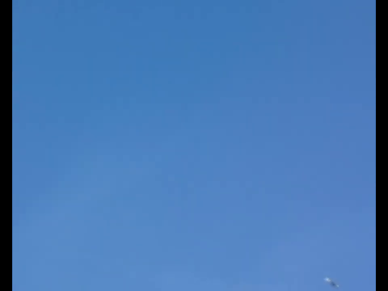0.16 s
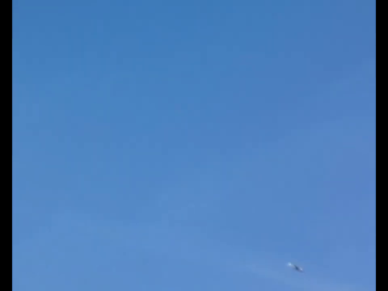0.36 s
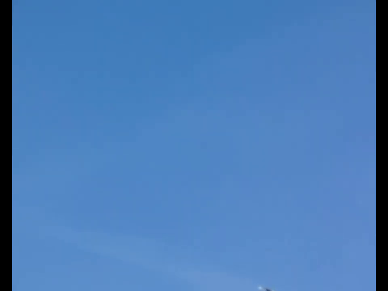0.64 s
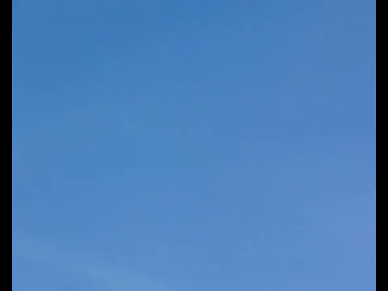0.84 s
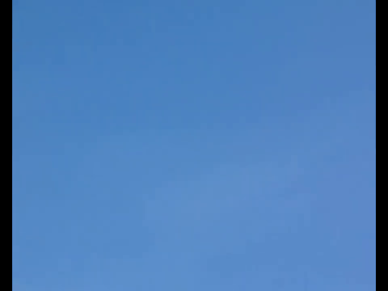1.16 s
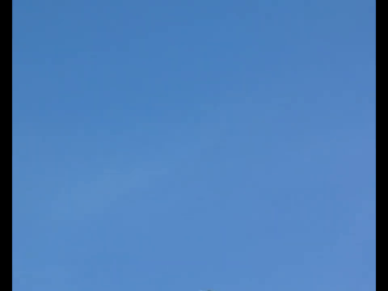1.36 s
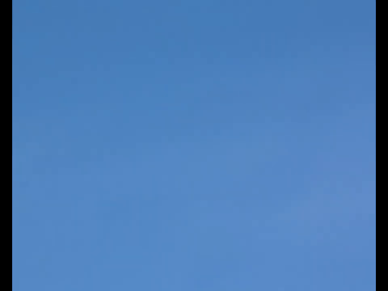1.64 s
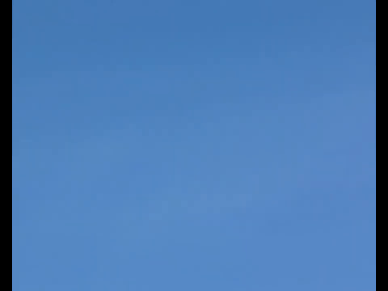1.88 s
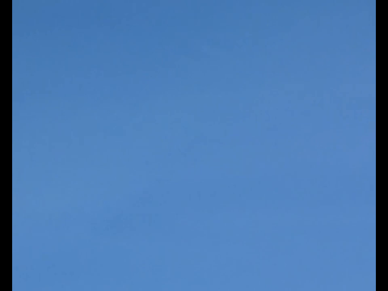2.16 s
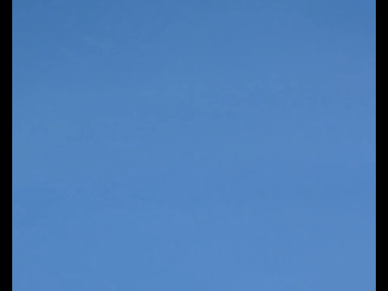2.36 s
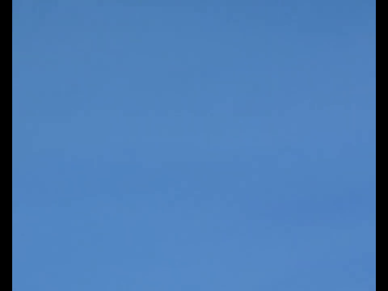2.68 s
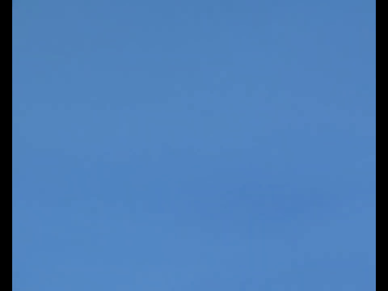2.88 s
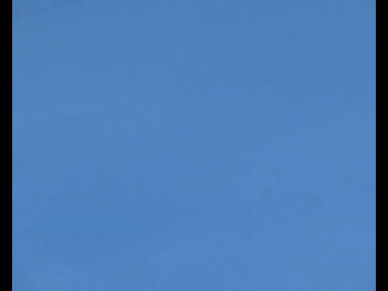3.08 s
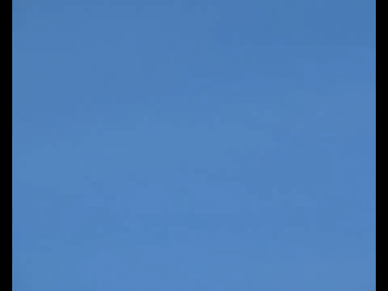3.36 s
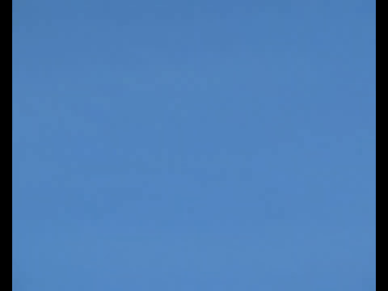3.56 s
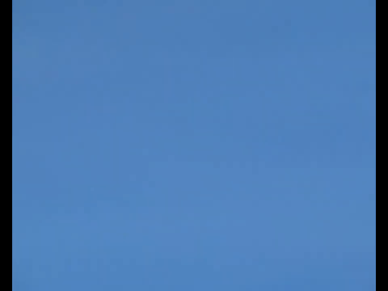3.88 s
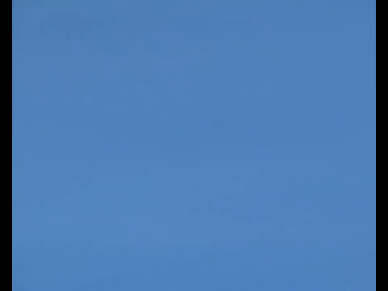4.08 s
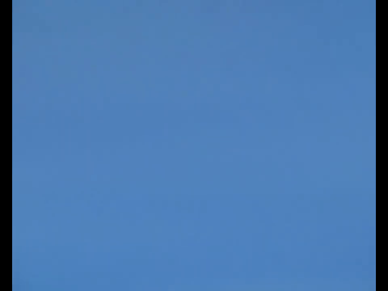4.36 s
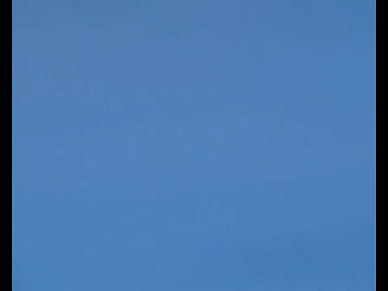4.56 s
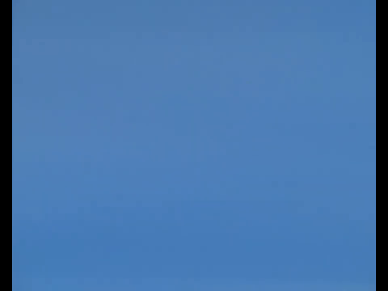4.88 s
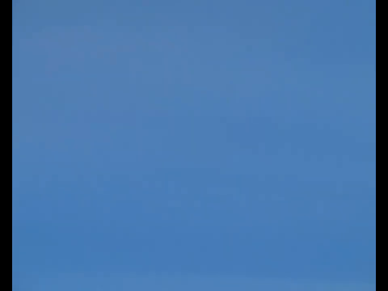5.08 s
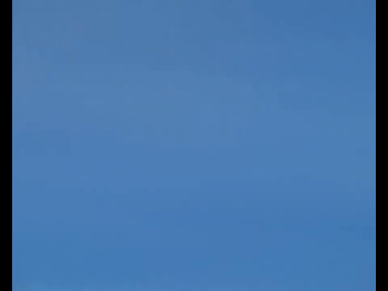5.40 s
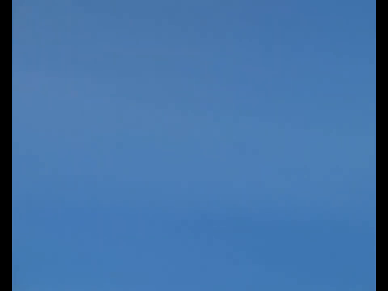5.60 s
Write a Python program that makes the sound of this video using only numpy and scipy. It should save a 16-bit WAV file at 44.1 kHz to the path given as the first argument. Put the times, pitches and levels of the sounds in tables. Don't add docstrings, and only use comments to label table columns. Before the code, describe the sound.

Outdoors, a model jet's breathy rush grows from faint to loud, fluttering and sweeping in tone, over light hiss, with one bird call and a sharp tick.

```python
import sys
import numpy as np
from scipy import signal
from scipy.fft import rfft, irfft, next_fast_len
from scipy.io import wavfile
from scipy.ndimage import uniform_filter1d, map_coordinates

SR = 44100
rng = np.random.default_rng(int(sys.argv[2]) if len(sys.argv) > 2 else 0)


def gain_from_db(level_db):
    decades = np.asarray(level_db, float) / 20
    return 10 ** decades


def wrap_up_sound(samples):
    columns = np.atleast_2d(samples).T
    tamed = np.clip(columns, -1, 1)
    steps = np.round(tamed * 32767).astype(np.int16)
    wavfile.write(sys.argv[1], SR, steps)


N = 253134
HOP, SIZE = 256, 1024
POCKET_OCTAVES, TOOTH_OCTAVES = 0.33, 0.068


def evened(x):
    return x / np.sqrt(np.mean(abs(x) ** 2) + 1e-20)


def read(points, hz, axis=1):
    columns = np.transpose(points)
    return np.interp(np.log(hz + 1), np.log(columns[0] + 1), columns[axis])


def axes():
    return np.arange(N // HOP + SIZE // HOP + 1) * HOP / SR, np.fft.rfftfreq(SIZE, 1 / SR)


def noise():
    t, hz = axes()
    a, b = rng.standard_normal((len(t), len(hz), 2)).T
    return a + 1j * b


def patches(wide_hz, long_s):
    field = noise().real
    for _ in range(2):
        field = uniform_filter1d(field, max(round(wide_hz * SIZE / SR), 1), 0)
        field = uniform_filter1d(field, max(round(long_s * SR / HOP), 1), 1)
    return evened(field)


def pockets_db(rows, octaves):
    t, hz = axes()
    total = 0
    for at, pocket_hz, pocket_db, half in rows:
        across = np.log2((hz[:, None] + 1) / pocket_hz) / octaves
        along = (t - at) / half
        total = total + pocket_db * np.exp(-.5 * (across ** 2 + along ** 2))
    return total


def sound(z):
    return signal.istft(z, nperseg=SIZE, noverlap=SIZE - HOP)[1][..., :N]


def tone(s, hz, db, blur_hz):
    t = np.arange(N) / SR
    shake = blur_hz * evened(uniform_filter1d(rng.standard_normal(N), size=400))
    turns = np.cumsum(np.interp(t, s, hz) + shake) / SR
    sounding = (t > s[0]) & (t < s[-1])
    return np.sqrt(2) * sounding * gain_from_db(np.interp(t, s, db)) * np.sin(2 * np.pi * turns)


def ring(s, hz, t60):
    t = np.maximum(np.arange(N) / SR - s, 0)
    return np.sin(2 * np.pi * hz * t) * (1 - np.exp(-hz * t)) * gain_from_db(-60 * t / t60)


def delayed(x, lag_s):
    at = np.arange(N) - lag_s * SR
    return np.array([map_coordinates(row, [at], order=3, mode="reflect") for row in x])


def short_wave_flicker():
    return np.clip(axes()[1] / 4000, .25, 1.2)[:, None]


def exhaust_colour(rush_db, clear_db):
    tilt_hz = [262, 430, 1900, 2900, 5500, 9500]
    # (frequency [Hz], level [dB])
    exhaust = [(20, -50.5), (85, -10), (170, 4.5), (250, 13), (350, -3), (500, 3), (1200, 0), (1950, 0),
               (2700, 2), (3700, 0), (4800, 2), (6500, -4), (9000, -19.5), (14000, -58.5)]
    # (time [s], frequency [Hz], height [dB])
    hump = [
        (0, 650, -1),
        (.5, 704, 3.5),
        (1.1, 722, 5),
        (1.6, 540, 3.5),
        (2.5, 530, 1.5),
        (2.9, 520, 0.5),
        (3.2, 1500, 0.5),
        (3.6, 1530, 3.5),
        (5.74, 1600, 3),
    ]
    # (time [s], frequency [Hz], level [dB], half length
    # [s])
    pockets = [(0.099, 399, 0, .15), (0.298, 797, 0.5, 0.103), (0.58, 1350, 3.5, 0.098),
               (0.997, 740, 3.5, 0.12), (1.442, 2300, 0, 0.066), (1.949, 1870, 3, 0.23),
               (2.049, 752, -2, 0.25), (2.299, 752, 1.5, 0.22), (2.975, 2090, 3.5, 0.074),
               (3.587, 1410, -0.5, 0.072), (3.699, 315, 4, 0.32), (4.099, 3260, -1, 0.2),
               (4.49, 2200, -3, 0.082), (4.61, 756, 4, 0.048), (4.805, 172, 5, .3), (3.5, 152, -4, 0.33),
               (2.75, 9880, 2, 0.2), (4.901, 1600, 0.5, 0.2), (5.62, 800, 1, 0.11),
               (4.901, 9500, 0.5, 0.23), (5.55, 3000, 1.5, 0.15)]
    t, hz = axes()
    bass_db = np.minimum(-10, -44 - rush_db)
    upper_db = -10.5 + .5 * (rush_db + 29.5) + 0.21 * clear_db
    turned_away_db = -13 * np.maximum(t - 5.1, 0)
    far_db = -19 * np.maximum(1 - t, 0)
    top_db = -19 + 0.69 * clear_db + turned_away_db + far_db
    tilt = np.array([bass_db, 0 * t, 0 * t, upper_db, -17 + clear_db, top_db])
    share = np.array([np.interp(np.log(hz + 1), np.log(tilt_hz), one) for one in np.eye(len(tilt_hz))])
    colour_db = read(exhaust, hz)[:, None] + share.T @ tilt

    when, hump_hz, hump_db = np.transpose(hump)
    octaves = np.log2((hz[:, None] + 1) / np.interp(t, when, hump_hz))
    colour_db = colour_db + np.interp(t, when, hump_db) * np.exp(-(octaves / .5) ** 2)
    ahead = np.interp(t, [0, 1.9, 2.6], [1, 1, 0])
    colour_db = colour_db + 2.3 * ahead * np.exp(-((hz[:, None] - 4700) / 250) ** 2)
    return colour_db + pockets_db(pockets, POCKET_OCTAVES)


def gusts():
    # (time [s], level [dB], half length [s])
    eddies = [(0.006, 8.5, 0.061), (0.331, 4.5, 0.056), (0.384, -6.5, 0.032), (0.492, -4.5, 0.024),
              (0.84, -5.5, 0.028), (1.177, 1.5, 0.013), (1.22, -3, 0.0082), (1.47, -3.5, 0.0187),
              (1.702, 5.5, 0.027), (1.755, -4, 0.056), (2.165, 4, 0.058), (2.459, 4.0, 0.053),
              (2.51, -6.5, 0.016), (2.711, 3, 0.039), (2.941, -6.5, 0.095), (3.204, 5, 0.0242),
              (3.275, -5, 0.073), (3.46, 7, 0.041), (3.53, -1.8, 0.009), (3.577, 5.5, 0.022),
              (3.879, -3, 0.0446), (4.151, -8.5, 0.069), (4.422, -5, 0.016), (4.634, -4, 0.012),
              (4.735, -2.5, 0.031), (5.058, -6.5, 0.064), (5.178, 2.5, 0.065), (5.36, -5.5, 0.044),
              (5.576, 6.5, 0.018), (5.65, 1, 0.0115), (.16, -1, .03), (.6, 1, 0.028), (.93, -1.5, 0.027),
              (1.03, 0, 0.0204), (1.33, -0.5, .03), (1.62, -4, 0.033), (1.95, 0.5, 0.0193),
              (2.05, -2, 0.032), (2.33, -2, 0.032), (2.62, -2.5, 0.034), (2.83, 3.5, 0.022),
              (3.03, 1.5, 0.025), (3.13, 1.5, 0.0138), (3.7, 0, 0.033), (4.0, 1.5, 0.028),
              (4.255, 1.5, 0.013), (4.33, 2, 0.026), (4.375, 3.5, .01), (4.47, 3, .01), (4.52, -2.5, 0.031),
              (4.585, 2, 0.011), (4.68, 0, 0.011), (4.8, 0.5, .015), (4.895, 2, 0.011), (5.02, 3, 0.016),
              (5.25, 2, 0.0184), (5.45, 3, 0.013), (5.7, 3, 0.021)]
    # (time [s], level [dB], half length [s])
    ripples = [(0.0, -6, 0.061), (0.412, 0, 0.012), (0.673, 3, 0.082), (0.865, 2, 0.0385),
               (1.016, 1, 0.063), (1.329, -1.5, 0.0118), (1.614, 4, 0.0185), (1.887, -1.8, 0.063),
               (2.142, -0.1, 0.06), (2.351, 2.5, 0.022), (2.601, 0.5, 0.0113), (2.688, -2, 0.015),
               (2.786, -1, 0.02), (2.92, 2.5, 0.028), (3.024, 0.5, 0.024), (3.129, 3, 0.022),
               (3.558, -0.9, 0.07), (3.733, 1, 0.0225), (3.814, -0.5, 0.0118), (3.994, -2.5, 0.019),
               (4.063, 0.5, 0.011), (4.348, -1.5, 0.02), (4.447, -1, 0.0347), (4.528, 2.5, 0.0183),
               (4.934, 1, 0.077), (5.741, 1, 0.035)]
    # (time [s], frequency [Hz], level [dB], half length
    # [s])
    dimples = [(0.023, 440, 5, 0.06), (0.04, 990, 3.5, 0.06), (0.306, 750, -6.5, 0.1),
               (0.325, 1740, -6, 0.073), (0.754, 2000, -5, 0.079), (1.06, 328, 3.5, 0.17),
               (1.07, 660, -4.5, 0.084), (1.16, 6960, 1, 0.053), (1.73, 1000, 1, 0.059),
               (2.22, 1520, 0.3, 0.12), (2.245, 661, 6.5, 0.063), (2.3, 3030, -0.8, 0.17),
               (2.32, 6960, -1.5, 0.17), (2.556, 1690, 3, 0.15), (2.71, 2680, 4, 0.068),
               (2.806, 1150, -3, 0.043), (2.873, 2500, -7.5, 0.043), (3.2, 8000, -3.5, 0.085),
               (3.492, 1150, 6, 0.031), (3.593, 2640, 2.5, 0.18), (3.637, 1310, -4.5, 0.052),
               (3.873, 980, 3.2, 0.19), (3.99, 439, -6.5, 0.11), (4.31, 650, -4.5, 0.048),
               (4.49, 6060, -1.5, 0.06), (4.55, 1320, -5.5, 0.041), (4.96, 2580, -4.5, 0.064),
               (5.062, 5280, -0.3, 0.1), (5.155, 440, -3.5, 0.21), (5.223, 3060, -6, 0.027),
               (5.308, 1000, 1.5, 0.038), (5.58, 1000, 3.5, 0.029), (5.2, 2740, 0.5, 0.081),
               (5.55, 2900, -1, .1), (1.3, 1900, -2.5, 0.12), (.62, 1950, -2.5, 0.11),
               (.62, 3900, -2.5, 0.11), (1.02, 4500, 2, 0.081), (4.11, 2270, 1.5, 0.16),
               (4.1, 3860, 4.5, .1), (2.52, 553, 0, 0.12), (3.98, 550, 4, 0.085), (5.66, 776, 0.5, 0.096),
               (.2, 5400, -6, .06), (.33, 4200, -3, .04), (4.6, 7050, 1.5, .08), (4.47, 5000, -0.5, .02),
               (4.948, 1550, -1, .1), (1.3, 740, 0.5, 0.12), (3.1, 2500, -0.5, .08), (5.4, 7000, 2.5, 0.09)]
    # (time [s], frequency [Hz], level [dB], half length [s])
    teeth = [(.5, 760, 3.5, 0.055), (0.62, 1460, 4.5, 0.08), (0.93, 730, 2.5, .12), (1.28, 740, 2.5, 0.1),
             (1.55, 710, 0, 0.055), (0.68, 870, -6, .1), (0.64, 1300, -3, .1), (4.1, 1230, -4.5, 0.16),
             (4.9, 1240, -6, 0.31), (5.3, 1330, -4.5, 0.19), (4.9, 1400, 2.5, .15), (5.28, 1620, 2, .15),
             (7.2, 800, -3, .2), (4.2, 1000, 2, .2), (5.2, 3100, -3, .12), (5.2, 3300, -2, 0.11),
             (3.82, 2400, 3.5, 0.11), (5, 2680, -3, 0.11), (4.62, 3300, -1.5, 0.17), (2.2, 810, 2, 0.14),
             (2.64, 540, 3.5, 0.17), (2.9, 1230, 1, 0.11), (0.36, 5000, 2, .08), (.65, 4700, 3, 0.11),
             (5.68, 800, -3, .1)]
    t, hz = axes()
    large_db = 0
    for at, db, half in list(eddies) + list(ripples):
        large_db = large_db + db * np.exp(-.5 * ((t - at) / half) ** 2)
    gusts_db = np.clip(hz / 3070, .05, 1.15)[:, None] * large_db
    fine_db = 1.05 * patches(5000, .02) + 1.34 * patches(700, .04)
    gusts_db = gusts_db + short_wave_flicker() * fine_db + 0.76 * patches(400, 0.11)
    gusts_db = gusts_db + 0.74 * pockets_db(dimples, POCKET_OCTAVES)
    return gusts_db + pockets_db(teeth, TOOTH_OCTAVES)


def ground_echo():
    # (time [s], lag [ms], long-wave firmness [factor], short-wave firmness [factor], long-wave turn
    bounce = [(0, 4.54, 1, 0.3, 0), (.4, 4.26, 0.4, 1, 0.63), (.65, 3.66, 1, 0.9, -.098),
              (.98, 3.14, 0.75, 1, -0.18), (1.4, 2.63, 0.88, 1, -.049), (1.82, 2.51, 0.7, 1, -0.3),
              (2.12, 2.68, 1.05, 1.1, 0.084), (2.66, 2.37, 1, 1, 0.29), (3.1, 2.16, 0.72, 0.4, .25),
              (3.4, 2.224, 0.9, 0.94, 0.25), (3.7, 2.13, 0.87, 0.9, -0.0067),
              (3.95, 2.09, 0.66, 1.2, -0.12), (4.1, 2.03, 1.05, 0.75, 0), (4.25, 1.94, 0.8, 0.9, -.15),
              (4.6, 2.01, 0.9, 0.9, -.065), (4.8, 1.88, 0.92, 1.15, -.15), (4.95, 1.92, 0.95, 0.85, -0.063),
              (5.18, 1.8, 0.9, 0.9, -0.56), (5.46, 1.745, 1.05, 0.5, -0.62), (5.74, 1.77, 0.93, 0.5, -.55)]
    # (frequency [Hz], factor [1])
    ground = [(150, 0.89), (600, 0.63), (850, 0.7), (1250, 1), (1800, 0.65), (2500, 0.63), (4000, 0.58),
              (8000, 0.57)]
    t, hz = axes()
    flicker = short_wave_flicker()
    at, lag_ms, firm, crisp, turn = np.transpose(bounce)
    lag = np.interp(t, at, lag_ms) / 1000
    turned = np.interp(t, at, turn) * np.minimum(hz[:, None] / 800, 1) / (1 + (hz[:, None] / 1310) ** 4)
    wobble = turned + (0.08 + 0.26 * flicker) * patches(700, .07)
    back = np.clip(read(ground, hz), 0, 1)[:, None] * gain_from_db((0.4 + 1.4 * flicker) * patches(690, 0.077))
    short = 1 / (1 + (1820 / (hz[:, None] + 1)) ** 4)
    firmness = (1 - short) * np.interp(t, at, firm) + short * np.interp(t, at, crisp)
    return lag, back * np.clip(firmness, .05, 1.4), wobble


def ports(z):
    # (frequency [Hz], level [dB], phase [rad])
    port_gap = [(100, -39, 0.), (300, -37.5, 0.), (700, -34.5, 0.25), (1100, -36.5, .8), (1600, -26.5, 1.),
                (2600, -34.5, 1.), (3500, -26, .8), (4500, -22.5, .7), (5500, -20, .2), (6500, -25, -.4),
                (8000, -28, -2.)]
    # (time [s], level [dB])
    aside = [
        (0, -3),
        (2.2, 2),
        (2.9, 1),
        (3.2, -3),
        (4.8, -3.5),
        (5.74, -0.5),
    ]
    t, hz = axes()
    copy = z * np.exp(1j * read(port_gap, hz, axis=2))[:, None]
    aside_db = np.interp(t, *np.transpose(aside)) / (1 + (hz[:, None] / 3000) ** 4)
    side = gain_from_db(read(port_gap, hz)[:, None] + aside_db) * (copy + 0.66 * abs(z) * noise())
    return sound(np.array([z + side, z - side]))


def jet():
    # (time [s], rush level [dB], clarity of the air path [dB])
    flight = [(0, -42, -2.5), (.55, -35, -0.82), (.73, -37, -3), (1.07, -33.5, 2.5), (1.7, -33, -1.6),
              (1.95, -31, -0.5), (2.32, -33, -2), (2.65, -29, -5), (3.01, -25, -5), (3.44, -28.5, -0.1),
              (4, -23, 3.5), (4.17, -19.5, 3), (4.53, -25.5, 0.6), (5.04, -22.5, 8), (5.53, -25.5, 4),
              (5.74, -27, 4.5)]
    t, hz = axes()
    s, level_db, clarity_db = np.transpose(flight)
    rush_db, clear_db = np.interp(t, s, level_db), np.interp(t, s, clarity_db)
    colour_db = exhaust_colour(rush_db, clear_db)
    gusts_db = gusts()
    lag, back, wobble = ground_echo()

    comb = 1 + back * np.exp(-2j * np.pi * hz[:, None] * lag)
    band = (hz > 350) & (hz < 2200)
    body = np.sqrt((abs(comb * gain_from_db(colour_db))[band] ** 2).sum(0))
    unit = np.sqrt(np.mean(sound(noise() * band[:, None]) ** 2) / band.sum())
    straight = noise() * gain_from_db(colour_db + gusts_db + rush_db) / body / unit
    echo = ports(straight * back * np.exp(1j * wobble))
    return ports(straight) + delayed(echo, np.interp(np.arange(N) / SR, t, lag))


def hiss():
    # (frequency [Hz], level [dB])
    hiss_colour = [(25, -39), (40, -24), (60, 6), (150, -8.5), (500, -4.5), (2000, -13.5), (5000, -16),
                   (8000, -22.5), (9300, -27), (10600, -24), (12000, -28), (15800, -30.5)]
    # (frequency [Hz], share [1])
    hiss_same = [(60, 1), (130, 0.91), (200, 0.66), (500, 0.47), (3000, 0.46), (8000, 0.53), (9800, 0.92),
                 (11000, 0.56), (15000, .52), (15600, .9)]
    hz, shared, own = axes()[1], noise(), noise()
    same = np.clip(read(hiss_same, hz), 0, 1)[:, None]
    z = np.sqrt(1 + same) * shared + np.array([1, -1])[:, None, None] * np.sqrt(1 - same) * own
    return gain_from_db(-58.5) * evened(sound(z * gain_from_db(read(hiss_colour, hz))[:, None]))


def whine():
    # (frequency [Hz], left level [dB], right level [dB], left lead [rad])
    whine_tones = [(10400, -92, -94, 1), (10500, -87, -90, 0), (10600, -91.5, -91, 1),
                   (11100, -84, -91.5, -1.5), (12300, -90.5, -96, -6), (12900, -88, -96, -3),
                   (13500, -95, -92, 1), (14100, -91.5, -96, -3.5), (14700, -85, -95, 2.5),
                   (15000, -90, -102, 1), (15300, -92, -91, 1), (15625, -79, -83.5, 0),
                   (15650, -92, -94, -2)]
    t, out = np.arange(N) / SR, 0
    for hz, left_db, right_db, lead in whine_tones:
        angle = 2 * np.pi * (hz * t + rng.random()) + np.array([[lead], [0]])
        out = out + np.sqrt(2) * gain_from_db([[left_db], [right_db]]) * np.sin(angle)
    return out


def motor_notches(x):
    hum_hz = 300
    size = next_fast_len(N + SR)
    hz = np.fft.rfftfreq(size, 1 / SR)
    even = (2 * hum_hz, .6, 25)  # (spacing [Hz], depth, width [Hz])
    every = (hum_hz, 0.38 / (1 + (hz / 3000) ** 2), 22)
    keep = 1
    for step_hz, depth, width in (even, every):
        turn, r = np.exp(-2j * np.pi * hz / step_hz), np.exp(-np.pi * width / step_hz)
        keep = keep * (1 - (hz > step_hz / 2) * depth * (1 - r) * turn / (1 - r * turn))
    return irfft(rfft(x, size) * keep, size)[:, :N]


def bird():
    # (time [s], frequency [Hz], level [dB])
    call = [
        (.145, 4600, -61),
        (.17, 4850, -60),
        (.2, 4720, -63),
        (.23, 4430, -58.5),
        (.255, 4080, -58.5),
        (.28, 3740, -62),
        (.3, 3430, -59),
        (.33, 2880, -55),
        (.39, 2400, -65),
    ]
    return gain_from_db([[1.5], [-1.5]]) * tone(*np.transpose(call), blur_hz=25.2)


def shaft():
    # (time [s], shaft frequency [Hz])
    spool = [(.6, 2830), (.85, 2930), (1.13, 3130), (1.3, 3180), (1.55, 3290), (1.75, 3371), (2.0, 3480),
             (2.2, 3540), (2.4, 3550), (2.8, 3700), (3.15, 3680), (3.95, 3700)]
    # (time [s], level [dB], half length [s])
    beams = [
        (.95, -59, .15),
        (1.25, -51, .1),
        (1.45, -56.5, .15),
        (1.68, -57, .12),
        (1.95, -57, .12),
        (2.08, -54, .1),
        (2.23, -51, .12),
        (2.4, -61, .08),
    ]
    # (time [s], level [dB], half length [s])
    double_beams = [
        (3.02, -69, .12),
        (3.45, -62, .1),
        (3.65, -65.5, .15),
    ]
    s = np.arange(spool[0][0], spool[-1][0], HOP / SR)
    hz = np.interp(s, *np.transpose(spool))
    first_db = np.max([db - 5 * ((s - at) / half) ** 2 for at, db, half in beams], 0)
    second_db = np.max([db - 5 * ((s - at) / half) ** 2 for at, db, half in double_beams], 0)
    first_db = first_db + 2.3 * evened(uniform_filter1d(rng.standard_normal(len(s)), size=6))
    return tone(s, hz, first_db, blur_hz=2.5) + tone(s, 2 * hz, second_db, blur_hz=16)


def bump():
    # (time [s], frequency [Hz], t60 [s], level [dB])
    thuds = [
        (0.941, 394, 0.071, -31.5),
        (.945, 213, 0.088, -37),
    ]
    return sum(gain_from_db(db) * ring(s, hz, t60) for s, hz, t60, db in thuds)


def drone():
    # (time [s], frequency [Hz], level [dB])
    engine = [
        (2.2, 166.8, -76),
        (2.9, 167.8, -57),
        (5.74, 166.8, -58),
    ]
    return tone(*np.transpose(engine), blur_hz=12.0)


def tick():
    # (time [s], level [dB])
    rattle_path = [
        (3.0775, -62),
        (3.0785, -34),
        (3.081, -36.5),
        (3.0835, -38),
        (3.085, -58),
        (3.092, -55),
        (3.095, -64.5),
        (3.115, -71.5),
    ]
    # (frequency [Hz], t60 [s], left level [dB], right level [dB])
    case = [(4200, 0.018, -26, -19.5), (5400, .0106, -21, -16.5), (6580, 0.0064, -30, -29),
            (8700, 0.0055, -32, -35), (14200, .004, -39, -40), (11100, 0.0056, -33, -30),
            (9650, .0069, -35, -35), (7460, .008, -26, -28), (2400, .0214, -20, -41.5),
            (4600, .01, -29, -27), (5400, .008, -33, -38)]
    case_s = [3.0779, 3.081, 3.0795, 3.0788, 3.0786, 3.0800, 3.0815, 3.0822, 3.08, 3.0805, 3.0908]
    # (frequency [Hz], t60 [s], level [dB])
    rocking = [
        (465, .019, -15),
        (450, 0.09, -36),
        (750, .012, -19),
    ]
    s, db = np.transpose(rattle_path)
    t = np.arange(N) / SR
    a, b = rng.standard_normal((N, 2)).T
    low = signal.butter(2, [3500, 8500], "band", fs=SR, output="sos")
    high = signal.butter(2, [7800, 13000], "band", fs=SR, output="sos")
    bright = signal.sosfilt(low, [a + .3 * b, a - .3 * b])
    bright = bright + gain_from_db(-6) * signal.sosfilt(high, [a + .7 * b, a - .7 * b])
    rattle = evened(bright) * gain_from_db(np.interp(t, s, db)) * (t > s[0]) * (t < s[-1])
    rings = 0
    for at, (hz, t60, left_db, right_db) in zip(case_s, case):
        rings = rings + gain_from_db([[left_db], [right_db]]) * ring(at, hz, t60)
    knock = sum(gain_from_db(knock_db) * ring(3.081, hz, t60) for hz, t60, knock_db in rocking)
    return rattle + rings + np.array([[1], [-1]]) * knock


def scene():
    return jet() + hiss() + bird() + shaft() + bump() + drone() + tick()


def low_pass(x):
    return signal.sosfilt(signal.butter(12, 15780, fs=SR, output="sos"), x)


def record(dry):
    last = np.minimum(np.arange(N)[::-1] / 40, 1)
    return low_pass(last * (motor_notches(dry) + whine()))


dry = scene()
out = record(dry)
wrap_up_sound(out)
```